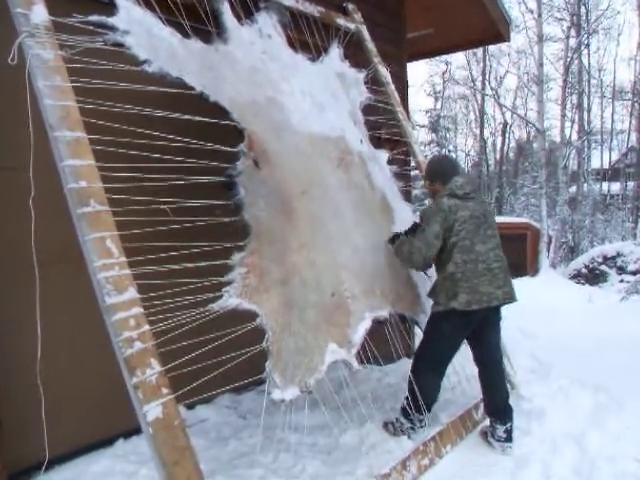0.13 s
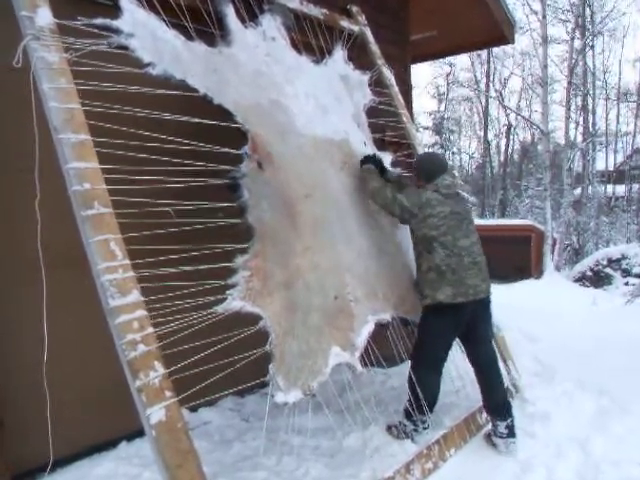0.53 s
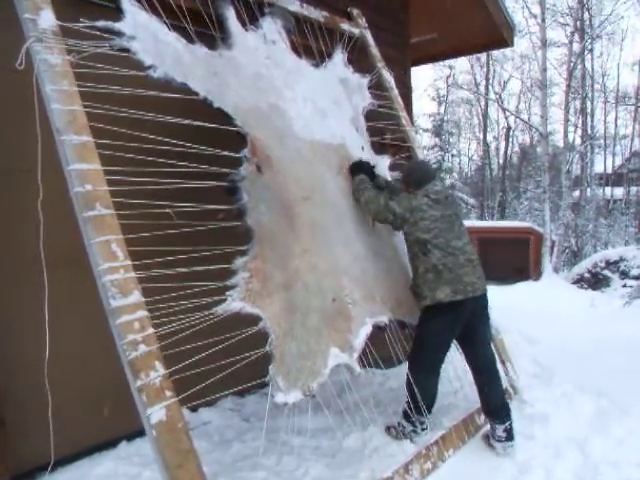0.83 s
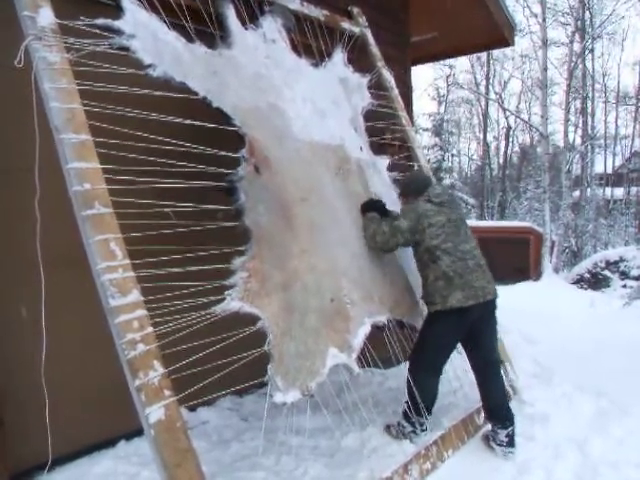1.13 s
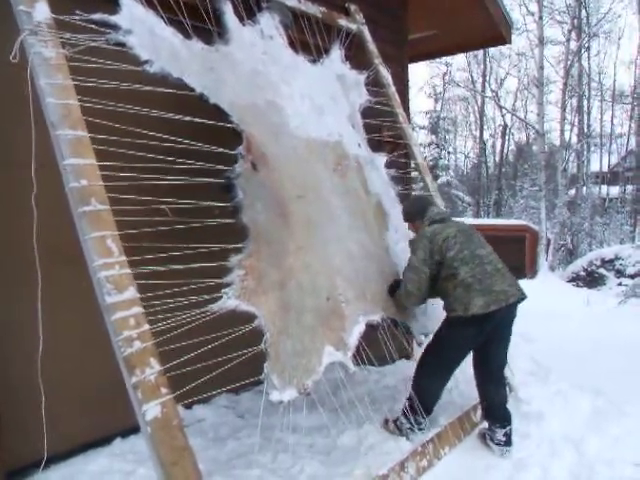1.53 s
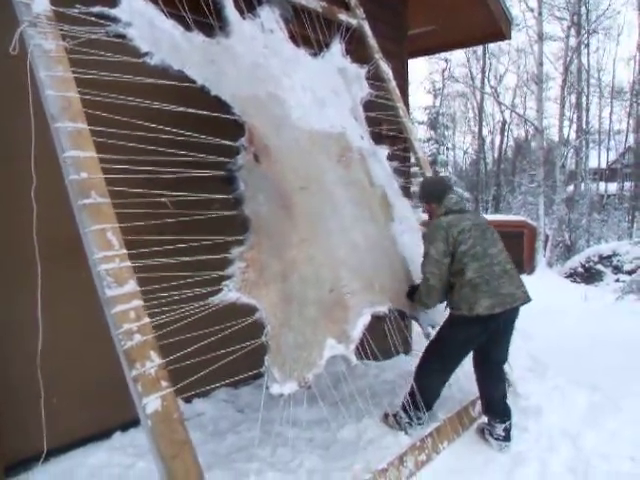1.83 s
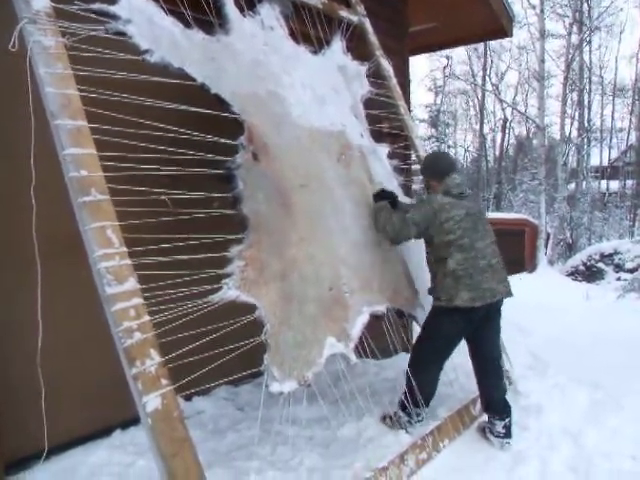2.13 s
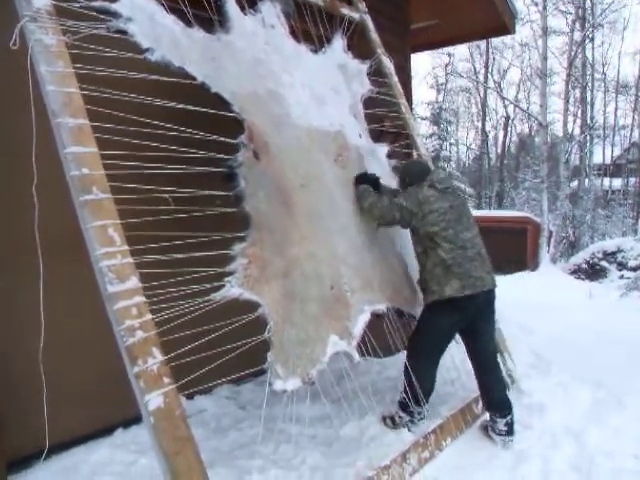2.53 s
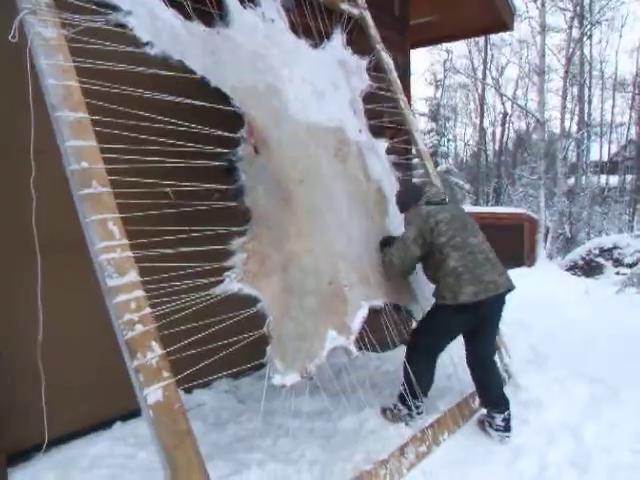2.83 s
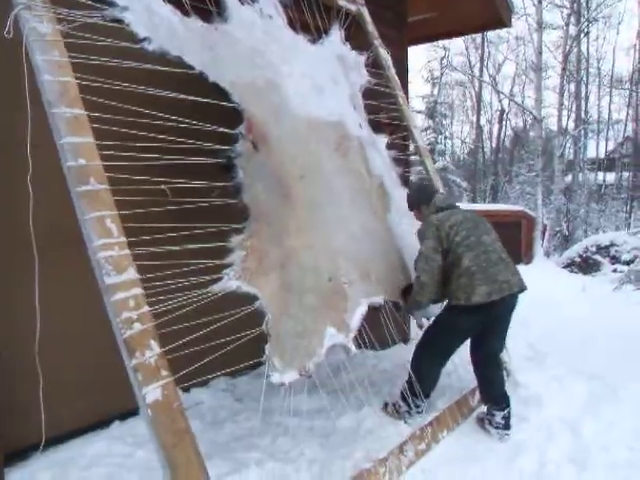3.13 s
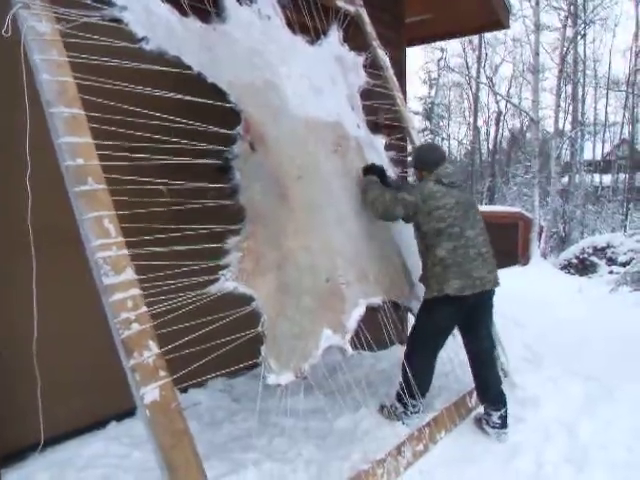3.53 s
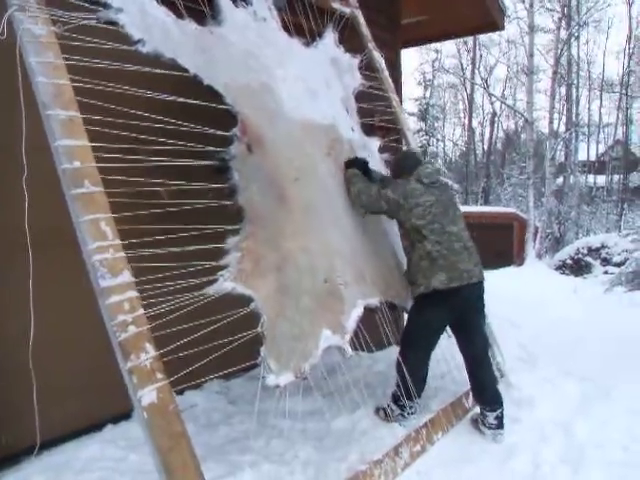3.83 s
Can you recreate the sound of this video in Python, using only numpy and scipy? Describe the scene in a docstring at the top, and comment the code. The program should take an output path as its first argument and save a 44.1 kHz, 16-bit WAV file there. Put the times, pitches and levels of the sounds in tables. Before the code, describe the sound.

A scraper drags down a frozen, tightly stretched hide: two long gritty rasps, then a third cut off at the end. Soft thumps, ice ticks and thin bird chirps between, outdoors, on a dull, grainy camera microphone.

```python
"""A scraper is drawn three times down a frozen hide laced in a frame, outdoors in snow.
The blade lands with a thump, tears the crust in dense tiny breaks, and makes skin and blade ring.
Damped tones make two blade clicks, puffs of noise make ice ticks, and sliding whistles make the birds.
Shaped noise gives a faint drone and hiss of air. A camera samples it all at 16 kHz and 8 bits,
so the quiet air mostly toggles between two steps."""
import sys
import numpy as np
from scipy import signal
from scipy.fft import rfft, irfft
from scipy.io import wavfile
from scipy.ndimage import uniform_filter1d

SR = 44100
rng = np.random.default_rng(int(sys.argv[2]) if len(sys.argv) > 2 else 0)


def voltage_ratio(decibels):
    """Convert decibels (scalar or array-like) to amplitude ratios, 20 dB per decade."""
    exponent = np.asarray(decibels, float) / 20
    return 10 ** exponent


def to_wav(s):
    """Save 16-bit WAV."""
    ch = np.atleast_2d(s).T  # columns
    pcm = np.round(np.clip(ch, -1, 1) * 32767)  # PCM
    wavfile.write(sys.argv[1], SR, pcm.astype(np.int16))


N = 176400  # length [samples], 4 s

# One list per stroke, levels before the judder: (time [s], thud of the frame [dB],
# drum of the skin [dB], rasp [dB], hiss [dB], top of the hiss [dB])
STROKE_LEVELS = [
    [(0.805, -76, -74, -61, -67.5, -65.5), (0.826, -63, -49.5, -50, -46.5, -43.5),
     (0.922, -55.5, -67, -40, -40.5, -35.5), (0.984, -52, -39.5, -46, -36, -46.5),
     (1.085, -55, -45.5, -36, -34.5, -32.5), (1.1, -46, -36.5, -36, -31.5, -37.5),
     (1.16, -43.5, -39, -32.5, -34.5, -29), (1.258, -58.5, -45.5, -37, -32, -44),
     (1.34, -49, -43, -31.5, -33, -33.5), (1.416, -64, -49.5, -37.5, -33.5, -38.5),
     (1.564, -41.5, -52.5, -30, -31.5, -32), (1.616, -51.5, -41, -28.5, -31.5, -39.5),
     (1.664, -57.5, -46.5, -37.5, -39.5, -46.5), (1.686, -53, -45.5, -37.5, -38, -51),
     (1.73, -48, -74, -36, -35, -48), (1.756, -53, -60, -35, -31, -36.5),
     (1.794, -52, -57.5, -33.5, -26.5, -44.5), (1.835, -55, -63.5, -42, -39.5, -44),
     (1.885, -83, -83, -61.5, -61.5, -88)],
    [(2.47, -62, -57.5, -69, -76, -77), (2.486, -71, -53.5, -57.5, -48.5, -54),
     (2.528, -53.5, -51, -42, -42.5, -42.5), (2.564, -51.5, -56.5, -39.5, -43.5, -38),
     (2.596, -51.5, -36.5, -38, -37.5, -35.5), (2.638, -43, -32, -38, -34.5, -38.5),
     (2.682, -49.5, -48, -35.5, -33.5, -34.5), (2.794, -54.5, -38.5, -30.5, -33.5, -35.5),
     (2.834, -53.5, -44.5, -33.5, -32, -32.5), (2.954, -48, -65, -29.5, -32.5, -35.5),
     (3.046, -40.5, -49, -31, -33.5, -35), (3.09, -53, -52.5, -44, -44.5, -46),
     (3.096, -50, -58.5, -36, -45, -31), (3.128, -55.5, -51, -36, -38.5, -52),
     (3.194, -50, -57, -33.5, -34.5, -40), (3.218, -70.5, -48.5, -44, -41.5, -45),
     (3.25, -67, -61, -52.5, -53, -54)],
    [(3.83, -74, -51, -65.5, -57.5, -56), (3.844, -53, -58, -42, -50, -71),
     (3.868, -59, -51.5, -47, -47, -61), (3.882, -53, -46, -48, -46, -51), (3.904, -54, -50, -44, -46, -52),
     (3.942, -46, -37.5, -38, -39.5, -46), (3.964, -45, -41.5, -36.5, -38.5, -44.5),
     (3.985, -40.5, -30, -37.5, -37, -37)],
]
# Borders between those five pitch ranges: (frequency [Hz])
RANGE_BORDERS = [160, 450, 2200, 5800]
# Tone colour of the plain scrape: (frequency [Hz], relative level [dB])
SCRAPE_COLOUR = [(24, -23), (40, -22), (81, -5), (164, -10.5), (285, -8), (363, -8.5), (397, -12),
                 (1020, -1.5), (1170, -2), (1430, -7), (2650, -6), (7140, -2), (7800, -10.5), (10100, -52),
                 (17200, -120)]
# Resonances of the skin, before they wander: (frequency [Hz], width [Hz], level against plain scrape [dB])
SKIN_RINGS = [(204.5, 22, -3.5), (316.7, 61, 0), (858, 90, 1.5), (1028, 79, 3.5), (1428, 260, 3.5),
              (1748, 230, -4.5), (2344, 220, -3.5), (4580, 260, -12)]
# Resonances of the blade, before they wander and sing: (frequency [Hz], width [Hz], level [dB])
BLADE_RINGS = [(2892, 170, 3.5), (3664, 120, -2), (7580, 900, 4)]
# How strongly the blade sings, most as it first bites: (time [s], level [dB])
BLADE_SINGING = [(.8, 5.5), (.88, -2), (.9, 6.5), (.96, 4.5), (1.0, -9), (4, -2.5)]
# The blade lands on the skin: (time [s], peak level before echo [dB], push setting [ms])
LANDINGS = [(0.729, -29.5, 1.2), (0.9741, -21, 0.58), (1.095, -26, 1.4), (2.4362, -26.5, .9),
            (2.593, -21.5, 0.61), (2.647, -15, 0.38), (3.4416, -30.5, 0.45), (3.748, -30, 1.15),
            (3.844, -31, 0.43)]
# Tones of the struck skin: (frequency [Hz], relative level [dB], time to fade by 60 dB [s])
SKIN_MODES = [(111.5, -12, 0.052), (213, -11, 0.053), (279, -8.5, 0.047), (561, -7, 0.021),
              (658.5, 1, 0.03), (1090, -3.5, 0.015), (1384, 4, 0.012)]
# The blade clicks on the crust: (time [s], peak level before rattle [dB], tilt [dB per octave])
BLADE_CLICKS = [(3.7888, -14, -1.5), (3.7965, -3.5, 4)]
# Tones in a blade click: (frequency [Hz], level before tilt [dB], time to fade by 60 dB [s])
BLADE_MODES = [(1320, -6, 0.015), (1930, -7, 0.012), (2800, 0, 0.007), (3580, -8, 0.01), (4600, -8, 0.007),
               (5810, -8, 0.009), (6400, -10, 0.009), (7000, 9, 0.004)]
# Crumbs of ice tick: (time [s], peak level before echo [dB], centre [Hz], time to fade by 60 dB [s])
ICE_TICKS = [(.009, -26.5, 5930, 0.016), (1.953, -38, 6440, 0.017), (2.006, -29, 6100, 0.017),
             (2.309, -37.5, 3400, 0.008), (3.096, -30, 7300, 0.011), (3.323, -31, 2480, 0.028),
             (3.5698, -21, 4190, 0.012), (3.785, -27.5, 2930, .012)]
# Bird notes: (time [s], length [s], rms level before flutter [dB], start pitch [Hz], end pitch [Hz],
# glide time [s], hoarseness as scatter of the pitch [fraction])
BIRD_NOTES = [(1.31, 0.033, -26.5, 6590, 6570, 0.004, 0.0071),
              (1.428, 0.031, -25.5, 5480, 6410, .005, 0.008),
              (1.456, .009, -36.5, 6400, 5300, 0.0076, 0.016), (1.472, .018, -27.5, 4390, 5470, 0.02, 0.04),
              (2.305, 0.028, -39, 7310, 7910, 0.008, 0.0035),
              (2.331, 0.029, -37, 7920, 7940, 0.0083, 0.0033),
              (3.102, 0.027, -24.5, 5730, 6730, .007, 0.031), (3.21, 0.037, -24.5, 5680, 6470, .006, 0.011),
              (3.252, 0.062, -42.5, 6280, 7010, 0.054, .02), (3.256, 0.03, -34.5, 3820, 7810, 0.045, .045),
              (3.257, .03, -35.5, 3430, 6160, 0.04, 0.08), (3.283, 0.032, -41.5, 4760, 5440, .02, 0.08),
              (3.279, .018, -45, 2980, 3166, 0.019, .04), (3.311, 0.058, -47.5, 3530, 4505, 0.015, 0.091),
              (3.361, 0.055, -52.5, 2117, 2590, 0.021, 0.057), (3.366, 0.14, -49, 2810, 2640, .03, .025),
              (3.365, 0.12, -48, 4187, 5320, .04, 0.02), (3.367, 0.064, -49.5, 5180, 5520, 0.033, 0.026)]
# A far bird's even chips, same columns as the bird notes
FAR_CHIPS = [(s, .017, -49, 6780, 6700, .01, .015) for s in (.582, .683, .783)]
# Tone colour of the air: (frequency [Hz], relative level [dB])
AIR_COLOUR = [(30, -15), (70, -9), (160, -11), (200, -0.5), (240, -9), (290, -5.5), (325, 0), (370, -7),
              (700, -11), (1500, -16), (3000, -19.5), (6100, -19), (7800, -20.5)]

BREAKS_PER_S, BREAK_SPREAD_DB = 11000, 1.4
JUDDER_DB, RING_WANDER_DB = .8, 2.6
MIC_FLAT_HZ = 7250  # the scrape's colour stays level above this
CLICK_RATTLE_DB, RATTLE_T60_S = -11, 0.017
TICK_Q = 1.1  # a low Q makes the ticks broad
FLUTTER_DB, BIRD_ECHO_DB, BIRD_ECHO_T60_S = 6.5, -10, .12
AIR_DB, AIR_SWELL_DB = -53.5, .7
WORK_ECHO_DB, TICK_ECHO_DB, YARD_T60_S = -18, -32.5, .1
CAMERA_RATE_HZ, SMOOTH_HZ = 16000, 7960
STEP, OFFSET_STEPS = 1 / 128 / np.sqrt(2), 0.073  # step as a fraction of full scale


def colour(table, hz):
    """Reads the gain at each frequency from a (frequency [Hz], level [dB]) table."""
    table = np.array(table)
    return voltage_ratio(np.interp(np.log(hz + 1), np.log(table[:, 0]), table[:, 1]))


def unit(x):
    """Scales a sound to rms 1."""
    return x / np.sqrt(np.mean(x ** 2))


def fade(t, t60):
    """Dies away by 60 dB in t60 seconds."""
    return np.exp(-np.log(1000) * t / t60)


def walk(rate):
    """Makes a smooth random curve of rms 1 from levels drawn about rate times a second."""
    hold = int(SR / rate)
    levels = np.repeat(rng.standard_normal(N // hold + 1), hold)
    smooth = uniform_filter1d(uniform_filter1d(levels, hold), hold)
    return unit(smooth[:N])


def add(out, s, x):
    """Mixes x into out at time s."""
    i = int(s * SR)
    out[i:i + len(x)] += x[:N - i]


def tail(x, db, t60):
    """Adds an echo of scattered reflections as fading noise."""
    t = np.arange(SR // 3) / SR
    echo = rng.standard_normal(len(t)) * fade(t, t60) * (t > .004)
    echo /= np.linalg.norm(echo)
    return x + voltage_ratio(db) * signal.fftconvolve(x, echo)[:N]


def scrape():
    """Dense uneven breaks ring blade and skin, each resonance wandering; five ranges follow the stroke."""
    t, hz = np.arange(N) / SR, np.fft.rfftfreq(N, 1 / SR)
    hits = rng.random(N) < BREAKS_PER_S / SR
    sizes = rng.standard_normal(N) * voltage_ratio(BREAK_SPREAD_DB * rng.exponential(size=N))
    plain = rfft(hits * sizes) * colour(SCRAPE_COLOUR, np.minimum(hz, MIC_FLAT_HZ))

    def ring(centre, width, db):
        """One resonance, driven by the breaks, that comes and goes."""
        tone = irfft(plain / (1 + 2j * (hz - centre) / width), N)
        return tone * voltage_ratio(db + RING_WANDER_DB * walk(40))

    skin = sum(ring(*row) for row in SKIN_RINGS)
    sing_s, sing_db = np.array(BLADE_SINGING).T
    blade = sum(ring(*row) for row in BLADE_RINGS) * voltage_ratio(np.interp(t, sing_s, sing_db))
    spectrum = rfft(irfft(plain, N) + skin + blade)

    # share of the power below each border; neighbours' differences give the five ranges
    below = [0] + [1 / (1 + (hz / border) ** 8) for border in RANGE_BORDERS] + [1]
    rows, judder, out = np.vstack(STROKE_LEVELS), walk(45), 0
    for k in range(len(below) - 1):
        band = unit(irfft(spectrum * np.sqrt(below[k + 1] - below[k]), N))
        level_db = np.interp(t, rows[:, 0], rows[:, k + 1])
        out = out + band * voltage_ratio(level_db + JUDDER_DB * (judder + 0.46 * walk(25)))
    # silence between strokes
    touching = sum((t >= s[0][0]) & (t <= s[-1][0] + .02) for s in STROKE_LEVELS)
    return out * uniform_filter1d(1. * touching, size=400)


def thumps():
    """A short push from the landing blade sets the skin's tones going."""
    out, t = np.zeros(N), np.arange(SR // 8) / SR
    ring = sum(voltage_ratio(db) * np.cos(2 * np.pi * hz * t) * fade(t, t60) for hz, db, t60 in SKIN_MODES)
    for s, db, push_ms in LANDINGS:
        push = np.hanning(int(push_ms * SR / 1000) + 3)
        thump = np.convolve(ring, push)
        add(out, s, voltage_ratio(db) * thump / np.abs(thump).max())
    return out


def clicks():
    """Damped tones of the blade, followed by a short rattle through the same tones."""
    out, t = np.zeros(N), np.arange(SR // 20) / SR
    for s, db, tilt_db in BLADE_CLICKS:
        click = np.zeros(len(t))
        for hz, mode_db, t60 in BLADE_MODES:
            gain = voltage_ratio(mode_db + tilt_db * np.log2(hz / 4000))
            click += gain * fade(t, t60) * np.sin(2 * np.pi * hz * t)
        click *= (1 - np.exp(-t / 0.00034)) ** 2  # soft start
        click /= np.abs(click).max()
        rattle = rng.standard_normal(len(t)) * fade(t, RATTLE_T60_S)
        rattle /= np.linalg.norm(rattle)
        click = click + voltage_ratio(CLICK_RATTLE_DB) * np.convolve(click, rattle)[:len(t)]
        add(out, s, voltage_ratio(db) * click)
    return out


def ticks():
    """Crumbs of ice make tiny puffs of bright noise that start fast and fade."""
    out, t = np.zeros(N), np.arange(SR // 20) / SR
    for s, db, hz, t60 in ICE_TICKS:
        noise = rng.standard_normal(len(t))
        puff = signal.lfilter(*signal.iirpeak(hz, TICK_Q, fs=SR), noise)
        puff = puff * fade(t, t60) * (1 - np.exp(-t / 0.00057))
        add(out, s, voltage_ratio(db) * puff / np.abs(puff).max())
    return out


def bird():
    """Thin whistles that slide and settle, fluttering, with a short echo off the trees."""
    out, flutter, waver = np.zeros(N), walk(180), walk(1300)
    for s, length, db, hz0, hz1, glide, hoarse in BIRD_NOTES + FAR_CHIPS:
        t = np.arange(int(length * SR)) / SR
        i = int(s * SR) + np.arange(len(t))
        hz = hz1 + (hz0 - hz1) * np.exp(-t / glide)
        hz = hz * (1 + hoarse * waver[i])
        whistle = np.sqrt(2) * np.sin(2 * np.pi * np.cumsum(hz) / SR)
        shape = np.clip(np.minimum(t / (0.08 * length), (length - t) / 0.0055), 0, 1)
        add(out, s, voltage_ratio(db - FLUTTER_DB * np.abs(flutter[i])) * shape * whistle)
    return tail(out, BIRD_ECHO_DB, BIRD_ECHO_T60_S)


def air():
    """Noise coloured into a faint distant drone and hiss, gently swelling."""
    hz = np.fft.rfftfreq(N, 1 / SR)
    noise = irfft(rfft(rng.standard_normal(N)) * colour(AIR_COLOUR, hz), N)
    return unit(noise) * voltage_ratio(AIR_DB + AIR_SWELL_DB * walk(4.2))


def scene():
    """Work on the hide with a little yard echo, then bird and air."""
    work = tail(scrape() + thumps(), WORK_ECHO_DB, YARD_T60_S)
    small_sounds = tail(clicks() + ticks(), TICK_ECHO_DB, YARD_T60_S)
    return (work + small_sounds + bird() + air())[None]


def low_pass(x):
    """Removes everything above the highest recorded frequency."""
    return signal.sosfilt(signal.butter(12, 9120, fs=SR, output="sos"), x)


def record(dry):
    """The camera samples at 16 kHz, rounds down to 8-bit steps and smooths the result back up."""
    # this filter lets a little through above 8 kHz, which mirrors to just below it
    gentle = signal.firwin(32 * 441 + 1, 8400, fs=SR * 160)
    low = signal.resample_poly(dry, 160, 441, axis=1, window=gentle)
    steps = np.floor(low / STEP + OFFSET_STEPS) * STEP
    smooth = signal.firwin(30 * 441 + 1, SMOOTH_HZ, window=("kaiser", 9), fs=CAMERA_RATE_HZ * 441)
    mix = signal.resample_poly(steps, 441, 160, axis=1, window=smooth)[:, :N]
    return low_pass(mix)


dry = scene()
out = record(dry)
to_wav(out)
```